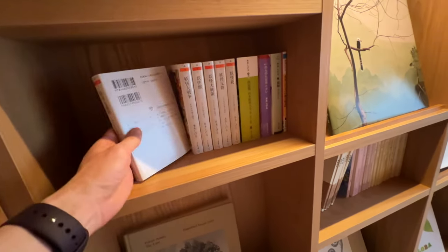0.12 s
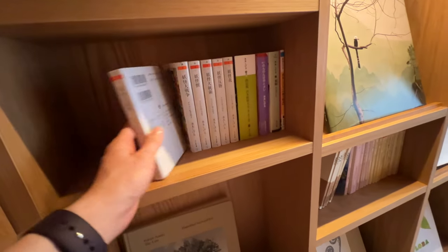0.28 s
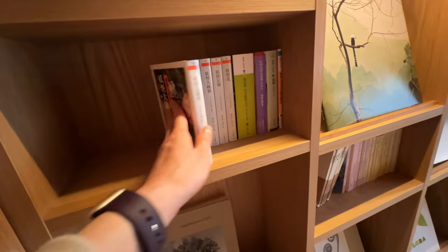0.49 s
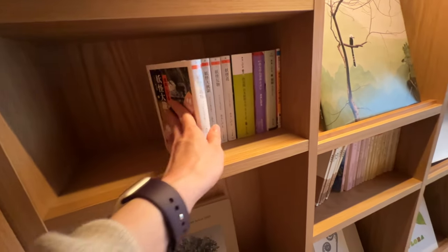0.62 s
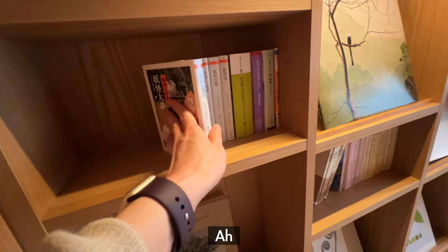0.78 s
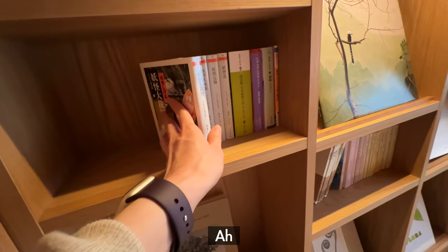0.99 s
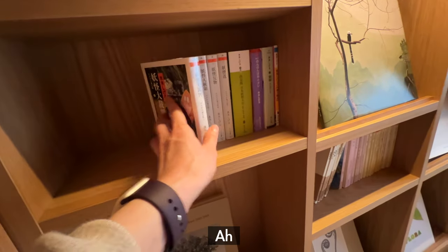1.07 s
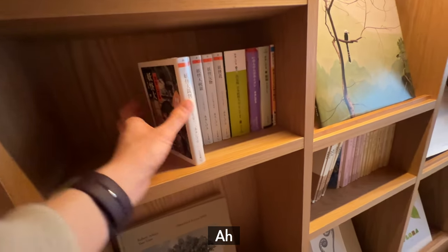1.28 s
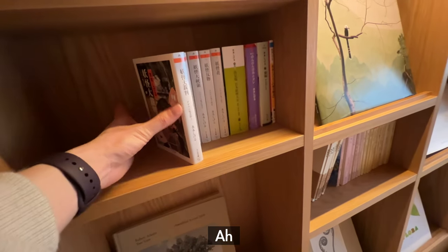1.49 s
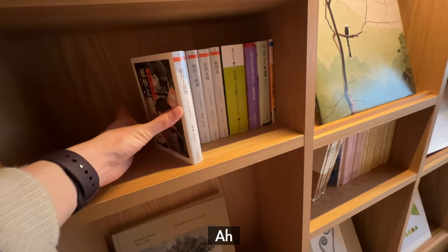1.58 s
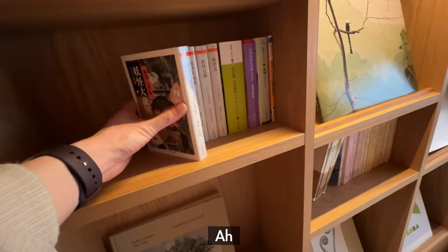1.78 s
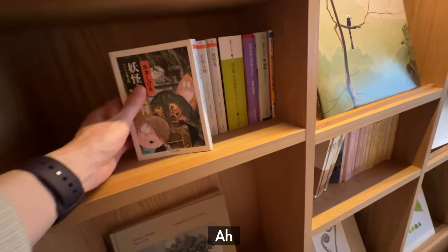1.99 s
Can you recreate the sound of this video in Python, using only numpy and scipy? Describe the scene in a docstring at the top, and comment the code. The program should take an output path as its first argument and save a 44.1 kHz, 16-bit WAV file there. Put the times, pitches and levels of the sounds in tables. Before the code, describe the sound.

A paperback scrapes on a wooden shelf: faint ticks from 0.1 s, then a hollow woody judder speeding up from 0.2 to 0.4 s, loudest around 0.3, with papery hiss and tiny pings. Soft sliding fades by 0.7. A brief light rub comes near 1.1, barely audible finger brushes at 1.3 and 1.5, then a smooth, slightly squeaky slide from 1.6 and quiet stuttering knocks around 2.0. Close, dry, low room rumble.

```python
"""A quickening judder rings the boards as a paperback is dragged along a wooden shelf compartment.
Its edge sticks and slips: each slip excites decaying board modes and a crack of noise from the cover.
Covers slide with a gritty noise hiss and nearly squeak in narrow bands of noise; pings and soft thumps
are single dying sines, fingers brush the cover in shaped noise, and a low room rumble lies under it."""
import sys
import numpy as np
from scipy import signal
from scipy.fft import rfft, irfft, next_fast_len
from scipy.io import wavfile
from scipy.ndimage import map_coordinates

SR = 44100
rng = np.random.default_rng(int(sys.argv[2]) if len(sys.argv) > 2 else 0)


def int16_out(signal):
    """Quantize to a 16-bit WAV file."""
    q = np.round(np.clip(np.atleast_2d(signal).T, -1, 1) * 32767)
    wavfile.write(sys.argv[1], SR, q.astype(np.int16))


def field_ratio(decibels):
    """Amplitude ratio for a level in dB (20 dB per decade); scalars and array-likes work."""
    return 10 ** (np.asarray(decibels, dtype=float) / 20)


N = 90405  # samples in the scene


def unit(x):
    """Normalisation to an rms of 1."""
    return x / np.sqrt(np.mean(x ** 2) + 1e-20)


def along(points, hz):
    """Interpolation of (Hz, value) points on a logarithmic frequency axis."""
    f, value = np.transpose(points)
    return np.interp(np.log(hz + 1), np.log(f + 1), value)


def filtered(x, response):
    """Linear filtering: the spectrum of x times a complex response of frequency."""
    m = next_fast_len(N + SR // 2)
    spectrum = rfft(x, m) * response(np.fft.rfftfreq(m, 1 / SR))
    return irfft(spectrum, m)[..., :N]


def coloured(x, spectrum):
    """Spectral shaping of x by (Hz, dB) points, brought to rms 1."""
    return unit(filtered(x, lambda hz: field_ratio(along(spectrum, hz))))


def wobble(rate):
    """Band-limited random modulation: a smooth curve through `rate` random knots a second."""
    knots = rng.standard_normal(int(N * rate / SR) + 4)
    return map_coordinates(knots, [np.arange(N) * rate / SR])


# Slips of the book's edge on the board. Each row: start in seconds, jolt level in dB,
# crack of the cover in dB over the jolt, low board modes in dB over their levels in SHELF.
SLIPS = [(0.096, -46, -2, -0.5), (0.111, -37.5, -8, -4.5), (0.12, -57, 12, -31.5), (0.133, -44.5, 1, -3.5),
         (0.1453, -38, 3, 0), (0.199, -24.5, -8.5, 0), (0.221, -22.5, -5.5, 2), (0.251, -24, -4.5, 5),
         (0.2774, -12.5, -11.5, -2.5), (0.297, -13, -17, -3), (0.314, -11, -24, -3), (0.328, -12, -27, -6),
         (0.34, -14, -18.5, -3.5), (0.349, -10, -30, -10), (0.357, -14.5, -21.5, -8), (0.364, -14, -27, 0),
         (0.371, -32, -23, 11), (0.394, -22.5, -32.5, -12), (0.403, -33, -22, -16), (0.997, -50, -26, -5.5),
         (1.33, -66, -1.5, -7), (1.947, -45, -6.5, 5.5), (1.964, -38, -5.5, 2.5), (1.977, -37, -29, 6),
         (1.99, -36.5, -4.5, -2), (1.998, -40.5, -23, 9), (2.016, -32.5, -5, -2.5),
         (2.026, -30.5, -18, 3.5), (2.036, -34.5, -6.5, -5), (2.045, -32.5, -38, 6.5)]
# Spectrum of the cover's crack. Each row: frequency in Hz, relative density in dB per Hz.
CRACK = [(700, -32), (1500, 4), (4000, -4.5), (7000, 0.5), (11000, -9), (16000, -11.5)]
CRACK_T60_S, ONSET_S = 0.02, 0.00091  # the soft onset also serves pings and thumps
# Before LANDED_S the book does not stand flat, and its corner drives the deepest modes harder.
LANDED_S, LIFTED_THUD_DB = 0.18, 19.5


def slips():
    """Stick-slip friction: each sudden slip jolts the shelf's modes and cracks the cover."""
    shelf, crack_level = np.zeros(N + SR), np.zeros(N + SR)
    hiss = coloured(rng.standard_normal(N), CRACK)
    t = np.arange(SR // 5) / SR
    onset = 1 - np.exp(-(t / ONSET_S) ** 2)
    for s, db, crack_db, board_db in SLIPS:
        i = round(s * SR)
        thud_db = board_db + LIFTED_THUD_DB * (s < LANDED_S)
        shelf[i:i + len(t)] += field_ratio(db) * ring(1.5, board_db, thud_db)
        crack_level[i:i + len(t)] += field_ratio(db + crack_db - 60 * t / CRACK_T60_S) * onset
    return shelf[:N] + filtered(crack_level[:N] * hiss, box)


# Modes of the shelf. Each row: frequency in Hz, level in dB before group and scatter offsets,
# decay time t60 in seconds, build-up time in seconds.
SHELF = [(102.9, -15, 0.06, 0.0046), (198.6, -10.5, 0.096, 0.0062), (310.1, -9, 0.083, 0.0033),
         (354.35, 1.5, 0.094, 0.0029), (422.6, -1.5, 0.078, 0.0045), (614, -11, 0.036, 0.003),
         (763, 3, 0.015, 0.000592), (882, -17, 0.022, 0.00038), (1240, -20, 0.044, 0.0015),
         (1460, -16, 0.017, 0.00027), (1670, -23, 0.011, 0.0004), (2422, -25, .02, 0.00027)]
# Direction in which each mode starts. One entry per mode: sign, +1 or -1.
FIRST_SWING = [1, -1, 1, -1, 1, -1, -1, -1, 1, -1, 1, -1]
THUD_HZ, BOARD_HZ = 260, 500  # tops of the two low mode groups


def ring(scatter_db, board_db, thud_db):
    """Modal superposition: one jolt's decaying modes; low neighbours start opposed and swell late."""
    t = np.arange(SR // 5) / SR
    scatter = rng.standard_normal(len(SHELF)) * scatter_db
    out = np.zeros(len(t))
    for (hz, db, t60, rise), offset_db, sign in zip(SHELF, scatter, FIRST_SWING):
        group_db = thud_db if hz < THUD_HZ else board_db if hz < BOARD_HZ else 0
        decay = field_ratio(db + offset_db + group_db - 60 * t / t60)
        build_up = 1 - np.exp(-(t / rise) ** 2)
        out += sign * decay * build_up * np.sin(2 * np.pi * hz * t)
    return out


# Sliding, one list per stroke. Each row: time in seconds, hiss of cover on cover in dB,
# drag on the board in dB over the hiss.
SLIDE = [
    [(.04, -94.5, 23), (.09, -61, 7.5), (.14, -56.5, 7.5), (.165, -64, -18), (.2, -50.5, -30)],
    [(.2, -53, 9), (.27, -41.5, -14), (.31, -40.5, 17.5), (.37, -44, -17), (.42, -47.5, -11),
     (.474, -46.5, -5), (.536, -66.5, 8), (.574, -53.5, -3), (.656, -55.5, -6.5), (.7, -75, 5.5),
     (.74, -100.5, -11)],
    [(.98, -72.5, -6), (1.002, -67.5, 4), (1.035, -70.5, 11.5), (1.072, -54.5, -3.5), (1.1, -48.5, -5.5),
     (1.144, -58.5, -8.5), (1.16, -81, 4), (1.178, -67.5, -12), (1.22, -94, -8)],
    [(1.56, -100, 12.5), (1.584, -69, 3.5), (1.664, -50.5, -8), (1.766, -54, -2.5), (1.84, -49.5, -12.5),
     (1.89, -53.5, -6), (1.928, -61, -23), (1.96, -54, 3), (2.05, -62.5, 17)],
]
# Spectrum of the hiss before the compartment's air. Each row: frequency in Hz, relative dB per Hz.
PAPER = [(180, -50.5), (300, -6), (625, -15.5), (981, -12), (1280, -8.5), (1760, -13), (10500, -16),
         (16200, -27.5)]
GRIT_PER_S, GRIT_DB, GRIT_SPREAD_DB = 2500, -6, 2  # grains per second, their rms over the noise, spread
FLUTTER_DB, FLUTTER_PER_S = 2, 39.42  # scale of the hiss's random level changes, knots per second


def sliding():
    """Sliding friction: random asperity contacts hiss through the air, and drag shakes the shelf."""
    t, level, drag = np.arange(N) / SR, np.zeros(N), np.zeros(N)
    for stroke in SLIDE:
        s, hiss_db, drag_db = np.transpose(stroke)
        inside = (t >= s[0]) & (t < s[-1])
        level += inside * field_ratio(np.interp(t, s, hiss_db))
        drag += inside * field_ratio(np.interp(t, s, hiss_db + drag_db))
    contacts = rng.random(N) < GRIT_PER_S / SR
    grain_sizes = field_ratio(GRIT_SPREAD_DB * rng.exponential(size=N))
    grains = contacts * grain_sizes * rng.standard_normal(N)
    rub = rng.standard_normal(N) + field_ratio(GRIT_DB) * unit(grains)
    hiss = unit(filtered(coloured(rub, PAPER), box))
    hiss = hiss * field_ratio(FLUTTER_DB * wobble(FLUTTER_PER_S))
    shelf_answer = ring(0, board_db=-12.5, thud_db=-6.0)
    shake = unit(signal.fftconvolve(rng.standard_normal(N), shelf_answer)[:N])
    return level * hiss + drag * shake


# Air resonances of the compartment. Each row: frequency in Hz, width in Hz, level in dB over the direct path.
BOX = [(800, 120, 0), (1180, 80, 2), (1310, 110, 5), (2150, 150, 0), (2700, 200, 2), (3750, 300, 3)]


def box(f):
    """Cavity resonance: the direct path plus second-order band-pass resonances of the air."""
    return 1 + sum(field_ratio(db) * 1j * f * w / (c * c - f * f + 1j * f * w) for c, w, db in BOX)


# Near-squeak of the glossy cover, a single row: middle in seconds, length in seconds, level in dB,
# pitch in Hz, width in Hz, loss in dB per overtone.
SQUEAK = (1.82, .12, -52, 1370, 150, 2)


def squeak():
    """Narrow-band noise: friction gathers round a pitch and two overtones."""
    s, length, db, pitch_hz, width_hz, loss_db = SQUEAK

    def bands(f):
        return sum(field_ratio(-loss_db * k) * np.exp(-((f - pitch_hz * (k + 1)) / width_hz) ** 2)
                   for k in range(3))

    swell = field_ratio(db) * np.exp(-(2 * (np.arange(N) / SR - s) / length) ** 4)
    return swell * unit(filtered(rng.standard_normal(N), bands))


# Pings of the cover, pitched by where it is pinched. Each row: start in seconds, frequency in Hz, level in dB.
PINGS = [(.2, 6000, -27), (.223, 2300, -33.5), (.254, 2300, -36.5), (.279, 2650, -20.5), (.28, 3650, -28),
         (0.314, 4700, -27), (0.34, 3800, -37.5), (1.968, 2800, -38), (2.018, 1450, -24.5),
         (2.038, 1500, -32)]


def pings():
    """Free vibration: the pinched cover rings briefly at one pitch."""
    return sum(knock(s, db, hz, 0.012) for s, hz, db in PINGS)


# Soft low pushes as the hand nudges the book. Each row: start in seconds, level in dB.
THUMPS = [(0.424, -35), (1.49, -42.5)]
THUMP_HZ, THUMP_T60_S = 77.8, 0.16


def thumps():
    """Impulse response of a low mode: each nudge starts one damped swing."""
    return sum(knock(s, db, THUMP_HZ, THUMP_T60_S) for s, db in THUMPS)


def knock(s, db, hz, t60):
    """Damped oscillation: one sine that starts softly and dies exponentially."""
    t = np.clip(np.arange(N) / SR - s, 0, None)
    onset = 1 - np.exp(-(t / ONSET_S) ** 2)
    return -field_ratio(db - 60 * t / t60) * onset * np.sin(2 * np.pi * hz * t)


# Fingers brushing the cover. Each row: middle in seconds, length in seconds, level in dB.
BRUSHES = [(1.266, 0.046, -72.5), (1.47, 0.049, -74.5)]
# Spectrum of the brushes. Each row: frequency in Hz, relative density in dB per Hz.
SKIN = [(2000, -26), (4500, -3.5), (7000, 3.5), (16000, -6.5)]


def fingers():
    """Friction noise: short, thin brushes of skin on the glossy cover."""
    t = np.arange(N) / SR
    swell = sum(field_ratio(db) * np.exp(-(2 * (t - s) / length) ** 4) for s, length, db in BRUSHES)
    return swell * coloured(rng.standard_normal(N), SKIN)


# Left-right difference of the book against its centre image. Each row: frequency in Hz, level in dB,
# phase lead in radians, share of the amplitude that keeps its shape.
WIDTH = [(100, -9, .8, .9), (330, -5, .7, .95), (425, -3, 2.6, .9), (560, -3, 2, .4), (750, -4, .3, .6),
         (900, 1, .6, .7), (1030, 8, .3, .85), (1320, 0, .6, .5), (1850, 6, -2, .4), (2650, -1, 0, .2),
         (3600, 0, -.2, .9), (10000, -7, 0, .2)]
WALLS_T60_S = 0.03


def spread(x):
    """Partial coherence: the difference is a phase-shifted copy plus a part scattered by near walls."""
    hz, db, lead, share = np.transpose(WIDTH)

    def read(column, f):
        return along(np.transpose([hz, column]), f)

    def coherent(f):
        return field_ratio(read(db, f)) * read(share, f) * np.exp(1j * read(lead, f))

    def incoherent(f):
        return field_ratio(read(db, f)) * np.sqrt(1 - read(share, f) ** 2)

    t = np.arange(SR // 20) / SR
    walls = rng.standard_normal(len(t)) * field_ratio(-60 * t / WALLS_T60_S)
    scattered = signal.fftconvolve(x, walls / np.linalg.norm(walls))[:N]
    scattered = scattered * unit(wobble(30))  # its strength and sign drift at random
    return filtered(x, coherent) + filtered(scattered, incoherent)


# Decay of the compartment and room. Each row: frequency in Hz, t60 in seconds.
ROOM = [(200, 0.27), (2000, 0.091), (12000, 0.022)]
# Filter on the reverberation. Each row: frequency in Hz, gain in dB.
ROOM_TONE = [(200, -10), (1500, -3.5), (14000, -9.5)]


def room(x):
    """Reverberation as exponentially decaying noise, independent in each channel."""
    hz, t, z = signal.stft(rng.standard_normal((2, SR // 4)), SR, nperseg=256)
    t60 = along(ROOM, hz)[:, None]
    decaying = z * field_ratio(-60 * t / t60) / np.sqrt(t60)  # the root evens out energy across frequency
    tail = signal.istft(decaying, SR, nperseg=256)[1]
    delayed = np.pad(x, (60, 0))[None]  # by 60 samples
    wet = signal.fftconvolve(delayed, tail / np.linalg.norm(tail[0]), axes=1)[:, :N]
    return filtered(wet, lambda f: field_ratio(along(ROOM_TONE, f)))


# Spectrum of the background. Each row: frequency in Hz, relative density in dB per Hz.
RUMBLE = [(20, -24.5), (72, -0.5), (134, -7), (229, -19), (271, -35.5), (390, -32.5), (764, -45),
          (2410, -51), (9000, -55.5), (16200, -59)]
# Left-right likeness of the background. Each row: frequency in Hz, correlation from 0 to 1.
RUMBLE_ALIKE = [(80, .96), (200, .7), (500, .4), (3000, .2)]
RUMBLE_DB = -52  # rms over both channels


def rumble():
    """Diffuse-field noise: low rumble over faint hiss, its channels less alike as frequency rises."""
    def mid_side(hz):
        angle = np.arccos(np.clip(along(RUMBLE_ALIKE, hz), -1, 1)) / 2
        return field_ratio(along(RUMBLE, hz)) * np.array([np.cos(angle), np.sin(angle)])

    mid, side = filtered(rng.standard_normal((2, N)), mid_side)
    return field_ratio(RUMBLE_DB) * unit(np.array([mid + side, mid - side]))


def scene():
    """Superposition: the book's centre image, its left-right difference, the room and the rumble."""
    book = slips() + pings() + thumps() + sliding() + squeak() + fingers()
    return book + np.array([[1], [-1]]) * spread(book) + room(book) + rumble()


def top_cut(x):
    """Nothing passes above the cut-off."""
    return signal.sosfilt(signal.butter(12, 16340, fs=SR, output="sos"), x)


def record(dry):
    """Band limitation: nothing at or above 15900 Hz passes the low-pass filter."""
    mix = filtered(dry, lambda hz: hz < 15900)
    return top_cut(mix)


dry = scene()
out = record(dry)
int16_out(out)
```